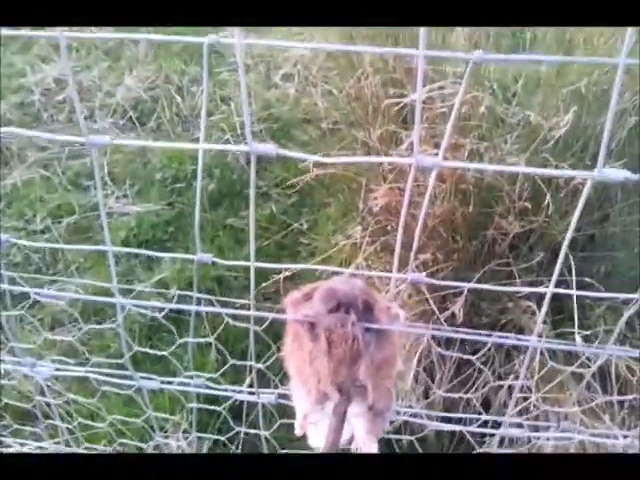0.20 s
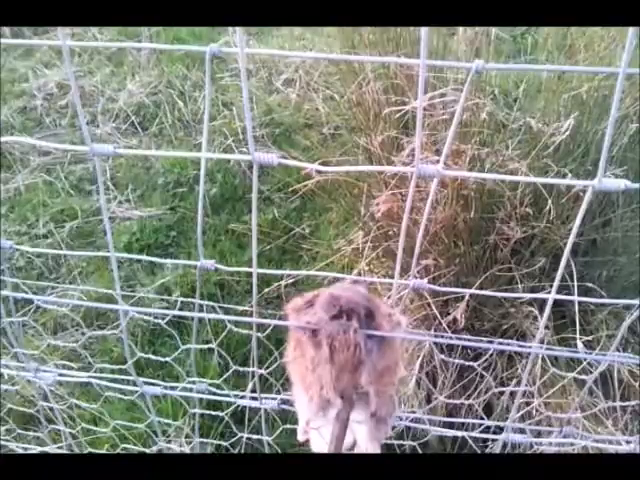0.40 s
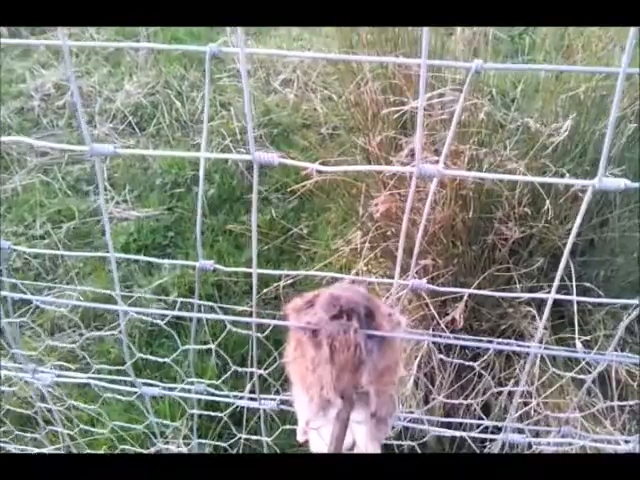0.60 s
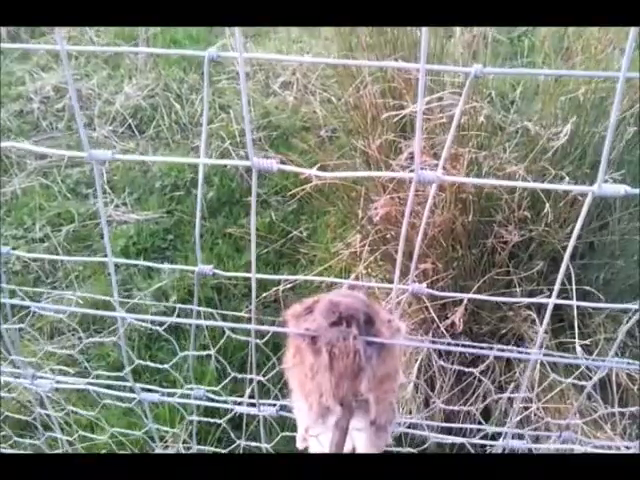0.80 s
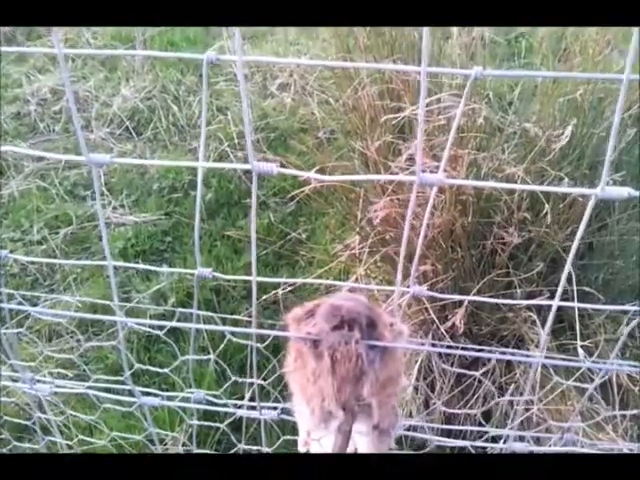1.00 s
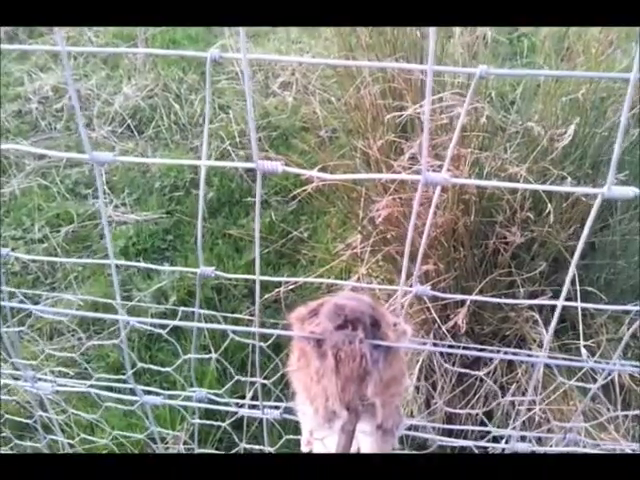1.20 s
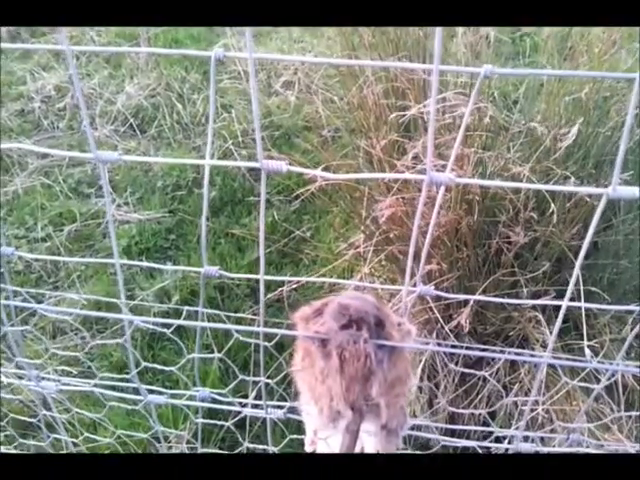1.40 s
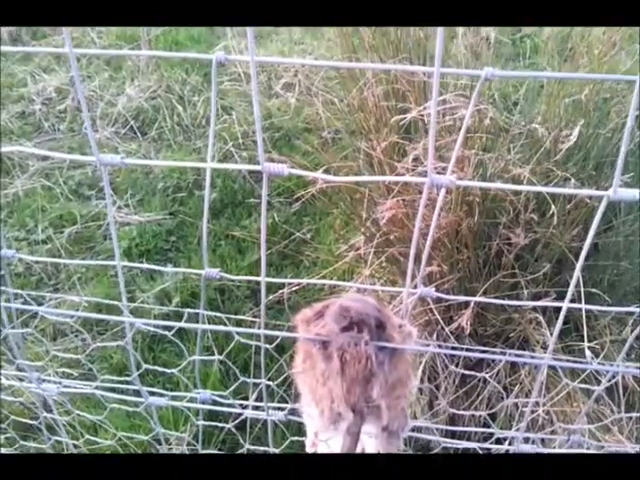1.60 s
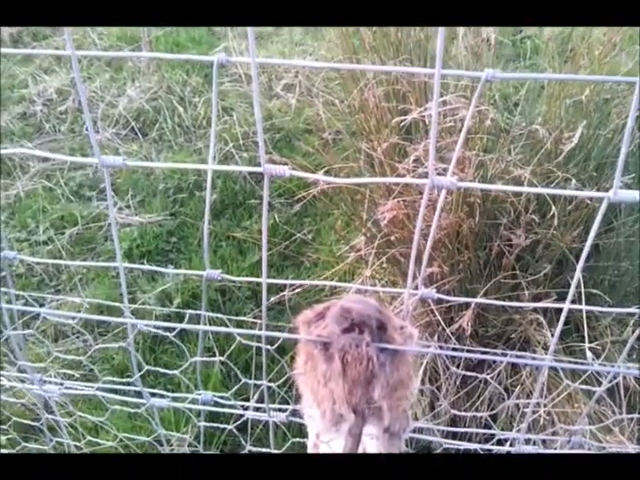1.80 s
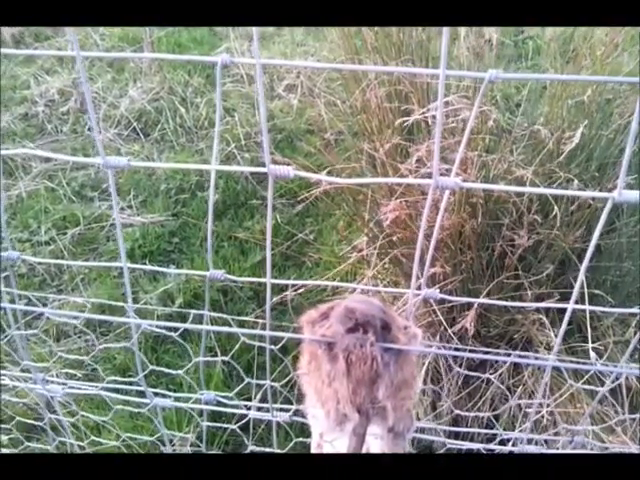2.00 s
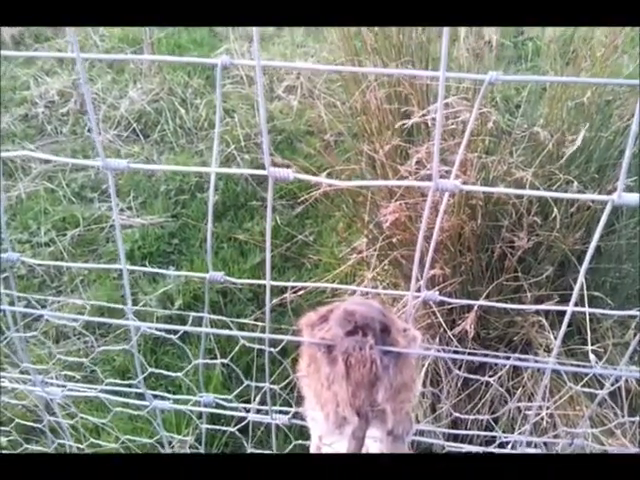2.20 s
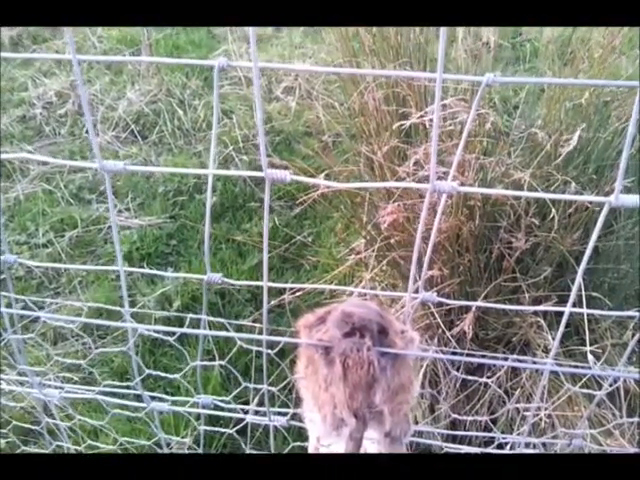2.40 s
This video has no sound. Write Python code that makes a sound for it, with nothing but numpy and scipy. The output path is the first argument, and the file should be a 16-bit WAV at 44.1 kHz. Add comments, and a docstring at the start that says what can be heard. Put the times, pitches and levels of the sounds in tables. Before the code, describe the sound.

Two sharp, overloaded spark cracks from an electric fence, over faint hiss and rumbling wind gusts

```python
"""Two hard electric snaps, each with a short rattle and echoes, amid low wind gusts and steady hiss.
An electric fence sparks close to a phone held in a field. The bare pressure step scatters off post, mesh
and grass, then comes back from things farther off: decaying coloured noise plus single clicks.
Wind buffets the microphone: noise that follows level curves, and single swings. Two faint ticks are
fading tones. The snaps overload the recorder, which bends and clips the peaks."""
import sys
import numpy as np
from scipy import signal
from scipy.fft import rfft, irfft, next_fast_len
from scipy.io import wavfile
from scipy.ndimage import uniform_filter1d, map_coordinates

SR = 44100
rng = np.random.default_rng(int(sys.argv[2]) if len(sys.argv) > 2 else 0)


def level_to_linear(level):
    """Convert decibel levels to linear amplitude factors, elementwise."""
    exponent = np.asarray(level, float) / 20
    return 10 ** exponent


def digitize_waveform(pressure):
    """Quantize a signal to 16-bit integers and store it at the path in sys.argv[1].

    Rows of a 2-D input are taken as channels; values are limited to [-1, 1].
    """
    field = np.atleast_2d(pressure).T
    bounded = np.clip(field, -1, 1)
    quanta = np.round(bounded * 32767).astype(np.int16)
    wavfile.write(sys.argv[1], SR, quanta)


N = 114660  # length in samples


def unit(x):
    """Scales a sound to rms 1."""
    return x / np.sqrt(np.mean(x ** 2) + 1e-20)


def along(points, hz):
    """Reads a curve of (f/Hz, value) points on a log frequency axis."""
    f, value = np.transpose(points)
    return np.interp(np.log(hz + 1), np.log(f + 1), value)


def wobble(rate):
    """A smooth random curve through `rate` random points a second."""
    position = np.arange(N) * rate / SR
    return map_coordinates(rng.standard_normal(200), [position])


def filtered(x, response):
    """Multiplies the spectrum of x by a response, a function of frequency in Hz."""
    padded = next_fast_len(len(x) + 8192)
    spectrum = rfft(x, padded) * response(np.fft.rfftfreq(padded, 1 / SR))
    return irfft(spectrum, padded)[:len(x)]


def noise(spectrum, size=N):
    """Random noise of rms 1, coloured by a spectrum curve."""
    white = rng.standard_normal(size)
    return unit(filtered(white, lambda hz: level_to_linear(along(spectrum, hz))))


def fade(t, t60, start=0):
    """Silent before start, then an exponential decay that loses 60 dB in t60 seconds."""
    return (t >= start) * level_to_linear(-60 * np.abs(t - start) / t60)


def evened(x, span_s):
    """Noise with part of its own wavering, averaged over span_s, divided out."""
    evenness = 0.7  # 0 = wavers like noise, 1 = swings steadily
    power = uniform_filter1d(np.abs(signal.hilbert(x)) ** 2, max(int(span_s * SR), 1))
    return unit(x / (np.abs(power) + .02) ** (evenness / 2))


def clipped(x, top, knee):
    """Overload: peaks are bent over at top; a larger knee bends them more sharply."""
    return x / (1 + np.abs(x / top) ** knee) ** (1 / knee)


def hiss():
    """The microphone's own steady noise."""
    # colour of the hiss: f/Hz, relative level/dB
    hiss_colour = [(90, -40), (150, -4), (250, -8.5), (400, -6), (700, -7), (1100, -10.5), (5500, -16),
                   (7600, -23.5), (9900, -60), (16800, -120)]
    return level_to_linear(-57) * noise(hiss_colour)


def deep_rumble():
    """The steady deep rumble of the air."""
    # colour of the rumble: f/Hz, relative level/dB
    deep_colour = [(10, -27.5), (22, 1), (40, -3), (60, -14.5), (90, -120)]
    return level_to_linear(-56.5) * noise(deep_colour)


def gusts():
    """Wind on the microphone: a swinging low rumble with a lumpy, brighter edge."""
    # strength of the wind over time: t/s, rumble level/dB, edge level/dB
    gust_levels = [(0.0, -54, -63), (0.184, -54, -62.5), (0.21, -56, -56), (0.27, -66, -54.5),
                   (0.314, -47, -67), (0.412, -65.5, -57.5), (0.528, -50, -69.5), (0.58, -56, -54.5),
                   (0.6, -63.5, -61.5), (0.608, -55.5, -65), (0.628, -29.5, -51), (0.656, -43, -55),
                   (0.68, -30.5, -48), (0.726, -29.5, -43.5), (0.756, -35, -57), (0.776, -29, -52.5),
                   (0.796, -48, -65.5), (0.826, -34, -49), (0.848, -43, -72), (0.866, -49, -57),
                   (0.902, -39, -63.5), (0.926, -55, -60.5), (0.958, -40, -66.5), (1.01, -57.5, -57),
                   (1.042, -38, -51.5), (1.072, -60, -73), (1.086, -40.5, -63), (1.138, -46.5, -62),
                   (1.168, -36.5, -52), (1.202, -46.5, -61.5), (1.248, -40.5, -58.5), (1.3, -58, -64),
                   (1.32, -42.5, -63), (1.352, -55, -66), (1.366, -28, -38), (1.385, -29.5, -37),
                   (1.4, -20, -31.5), (1.43, -25.5, -29.5), (1.455, -18.5, -36), (1.47, -29.5, -44),
                   (1.492, -27.5, -47), (1.501, -43, -58), (1.51, -23.5, -33), (1.535, -22.5, -33),
                   (1.549, -39.5, -49), (1.56, -29, -46.5), (1.598, -28, -30.5), (1.608, -45, -59),
                   (1.62, -48, -52), (1.63, -28.5, -39), (1.648, -27.5, -32), (1.66, -26.5, -45),
                   (1.675, -23, -35), (1.69, -30, -35), (1.708, -40, -57), (1.725, -38, -55),
                   (1.79, -31.5, -62), (1.818, -47.5, -70), (1.856, -36, -51), (1.884, -34.5, -56),
                   (1.998, -59, -66), (2.028, -47.5, -62), (2.064, -46.5, -68), (2.116, -27.5, -40.5),
                   (2.162, -42, -63), (2.19, -39, -53), (2.254, -51.5, -73), (2.274, -40, -61.5),
                   (2.302, -55.5, -57.5), (2.386, -50, -63), (2.418, -70.5, -61.5), (2.438, -51, -58.5),
                   (2.452, -58.5, -64.5), (2.52, -40, -54.5), (2.554, -44.5, -77.5), (2.6, -35.5, -51.5)]
    # colour of the rumble: f/Hz, relative level/dB
    rumble_colour = [(12, -41), (20, -13.5), (45, -5), (75, 3), (100, -1), (145, -7.5), (175, -14.5),
                     (230, -37.5), (370, -120)]
    # colour of the edge: f/Hz, relative level/dB
    edge_colour = [(90, -120), (130, -10.5), (200, 5.5), (300, -7), (420, -24), (700, -50), (1000, -120)]
    s, rumble_db, edge_db = np.transpose(gust_levels)
    t = np.arange(N) / SR
    rumble = evened(noise(rumble_colour), span_s=.012)
    lumps = level_to_linear(2.5 * wobble(45))
    edge = unit(lumps * evened(noise(edge_colour), span_s=.008))
    return level_to_linear(np.interp(t, s, rumble_db)) * rumble + level_to_linear(np.interp(t, s, edge_db)) * edge


def thumps():
    """Single hard buffets of wind: a sine under a bell, so it swings down and up and is gone."""
    # the buffets: t/s of the middle, level of the sine before the bell/dB, f/Hz
    buffets = [(.688, -23.5, 167), (0.717, -18, 111), (1.3954, -8, 97.3), (1.411, -10, 108),
               (1.452, -28, 375), (1.51, -24, 146), (1.598, -19.5, 196), (1.647, -26, 200),
               (1.675, -17.5, 118), (1.857, -27, 142), (2.114, -28.5, 158), (2.591, -28, 109)]
    bell_cycles = 0.36  # width (standard deviation) of the bell, in cycles of the sine
    t = np.arange(N) / SR
    out = np.zeros(N)
    for middle, db, hz in buffets:
        phase = 2 * np.pi * hz * (t - middle)
        bell = np.exp(-(phase / (2 * np.pi * bell_cycles)) ** 2 / 2)
        out += level_to_linear(db) * np.sin(phase) * bell
    return out


def ticks():
    """Faint ticks in the grass: short high tones that start at once and die away."""
    # the ticks: t/s, peak level/dB
    tick_list = [(0.417, -46.5), (1.5304, -52.5)]
    tick_hz, tick_t60 = 7000, .012  # pitch (Hz), decay time (s)
    t = np.arange(N) / SR
    tone = np.sin(2 * np.pi * tick_hz * t)
    return sum(level_to_linear(db) * fade(t, tick_t60, s) * tone for s, db in tick_list)


def scattered(t):
    """One pattern of a spark's step, scattered nearby, by the mesh, by the field and as single echoes."""
    # single echoes: delay t/s, level relative to the spark/dB
    echo_list = [(0.0284, -15), (.0433, -29), (.0456, -29), (.0545, -32), (.060, -34.5), (.0657, -36.5),
                 (.083, -37), (.101, -38.5), (.114, -39.5)]
    # colour of the near scatter: f/Hz, relative level/dB
    snap_colour = [(88, -38), (150, -33), (1150, -12), (1470, -6), (1880, -8.5), (2190, -9), (2940, -10),
                   (3760, -13), (4970, -5), (6260, 0.5), (7620, -17), (9910, -32.5), (16800, -120)]
    # colour of what returns from farther off: f/Hz, relative level/dB
    far_colour = [(290, -52), (500, -17.5), (968, -13), (1100, -3.5), (1940, -0.5), (3470, -7), (6650, 3.5),
                  (7620, -8.5), (9910, -35.5), (16800, -120)]
    # levels are in dB relative to the spark
    near_db, near_rise_s, near_t60, near_end_s = 5.5, 0.00029, .07, .0152  # dense scatter close by
    mesh_db, mesh_t60 = -19, 0.067  # scatter that follows the near one
    field_db, field_t60 = -34, 0.33  # diffuse answer of the field
    echo_t60, click_db = 0.0027, -1  # each echo: a fuzzy tail, and a click relative to the echo's level

    build_up = 1 - np.exp(-t / near_rise_s)
    cut_off = 1 / (1 + np.exp((t - near_end_s) / .0004))
    near = level_to_linear(near_db) * build_up * fade(t, near_t60) * cut_off
    mesh = level_to_linear(mesh_db) * fade(t, mesh_t60, near_end_s)
    field = level_to_linear(field_db) * fade(t, field_t60)
    tails = sum(level_to_linear(db) * fade(t, echo_t60, s) for s, db in echo_list)

    def colour(hz):
        return level_to_linear(along(far_colour, hz))

    impulses = sum(level_to_linear(db) * (np.arange(len(t)) == round(s * SR)) for s, db in echo_list)
    click_peak = filtered(1. * (t == 0), colour)[0]  # height of one coloured click
    clicks = level_to_linear(click_db) * filtered(impulses, colour) / click_peak
    near_sound = near * noise(snap_colour, size=len(t))
    far_sound = (mesh + field + tails) * noise(far_colour, size=len(t))
    return near_sound + far_sound + clicks


def microphone_push(t, push_db, length, back_db):
    """The overloaded microphone is shoved one way, swings back and settles."""
    push_after_s, recover_s = 0.00076, 0.011  # start of the push, moment of the widest swing back
    part = np.clip((t - push_after_s) / length, 0, 1)
    shove = np.sqrt(np.abs(np.sin(np.pi * part))) * (part < 1)
    v = t / recover_s
    swing_back = v ** 2 * np.exp(2 - 2 * v)
    return level_to_linear(push_db) * shove - level_to_linear(back_db) * swing_back


def sparks():
    """Every spark excites the same surroundings, and shoves the microphone."""
    # the sparks: t/s, strength/dB, low push level/dB, push direction (+1 or -1),
    # push length/s, swing back level/dB
    spark_list = [(.2261, -2, -2, 1, .0012, -36), (1.7417, -2, 2, -1, .0022, -21)]
    same = 0.91  # share of the scattered pattern that every spark repeats
    t = np.arange(SR // 2) / SR
    out = np.zeros(N + SR)
    shared = scattered(t)
    for s, db, push_db, direction, length, back_db in spark_list:
        snap = same * shared + np.sqrt(1 - same ** 2) * scattered(t)
        push = np.sign(direction) * microphone_push(t, push_db, length, back_db)
        out[round(s * SR):][:len(t)] += level_to_linear(db) * snap + push
    return out[:N]


def scene():
    """Adds up hiss, deep rumble, wind, ticks and sparks."""
    wind = gusts() + thumps()
    return (hiss() + deep_rumble() + wind + ticks() + sparks())[None]


def top_cut(x):
    """Nothing passes above the cut-off."""
    return signal.sosfilt(signal.butter(12, 18000, fs=SR, output="sos"), x)


def record(dry):
    """Microphone overload, a narrow band, then clipping, whose splatter reaches the upper band limit."""
    band_hz, band_width_hz = 7700, 150  # where the narrow band ends, how gradually
    top_hz = 16000  # upper band limit
    x = clipped(dry[0], top=0.99, knee=2.06)  # the microphone's own soft overload
    x = filtered(x, lambda hz: 1 / (1 + np.exp(np.clip((hz - band_hz) / band_width_hz, -50, 50))))
    x = clipped(x, top=.99, knee=20)  # hard clipping
    x = filtered(x, lambda hz: 1 / (1 + (hz / top_hz) ** 60))
    return top_cut(x[None])


dry = scene()
out = record(dry)
digitize_waveform(out)
```